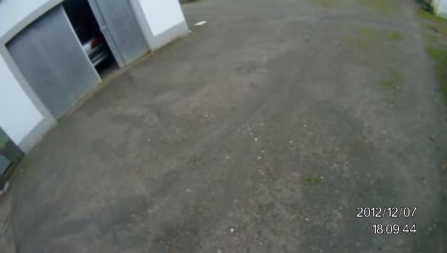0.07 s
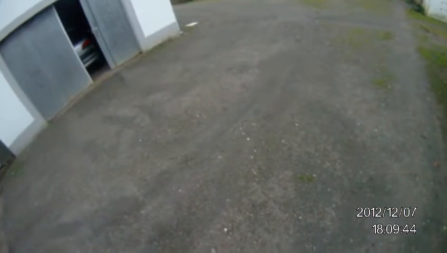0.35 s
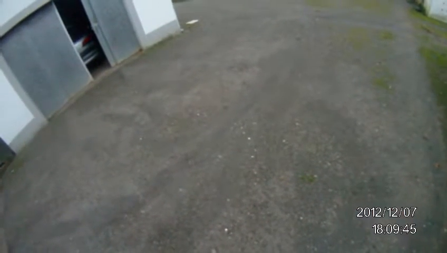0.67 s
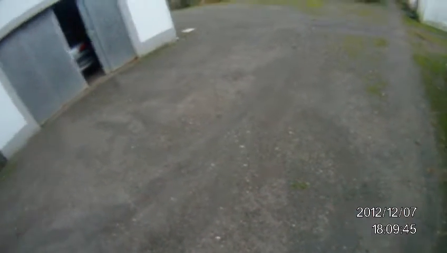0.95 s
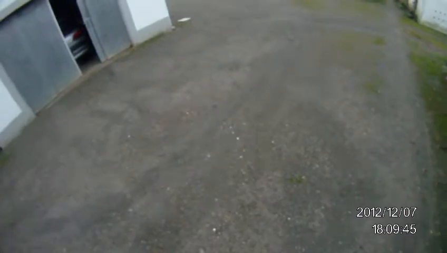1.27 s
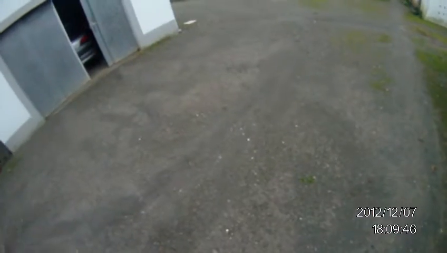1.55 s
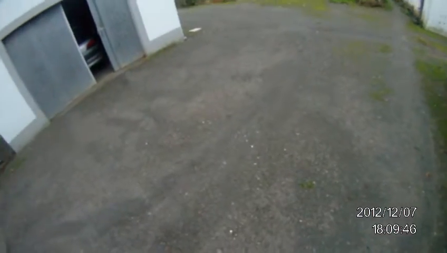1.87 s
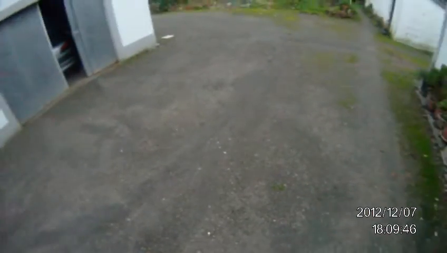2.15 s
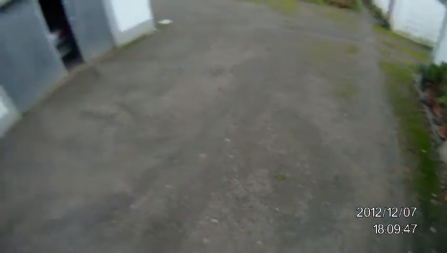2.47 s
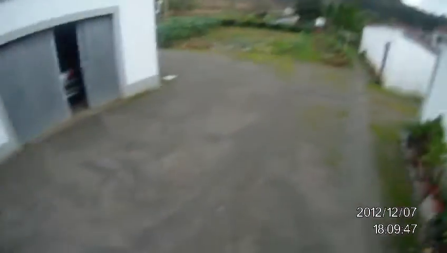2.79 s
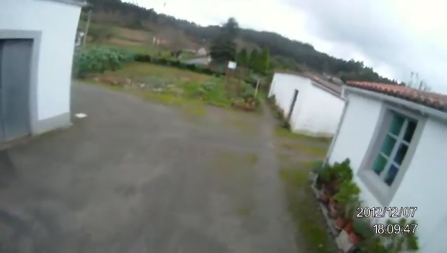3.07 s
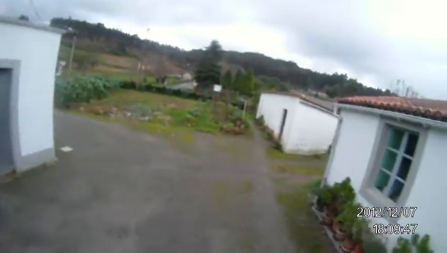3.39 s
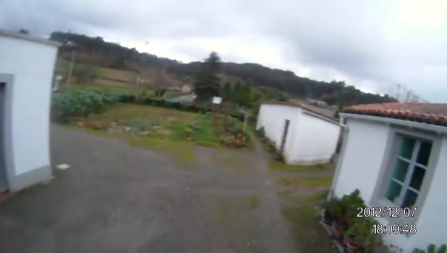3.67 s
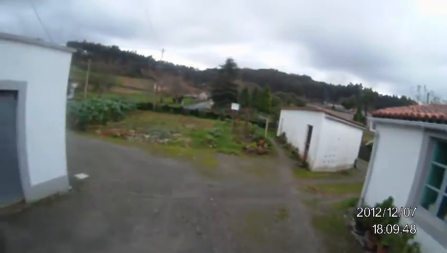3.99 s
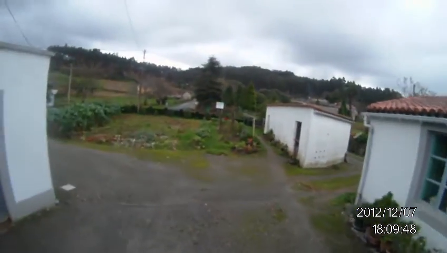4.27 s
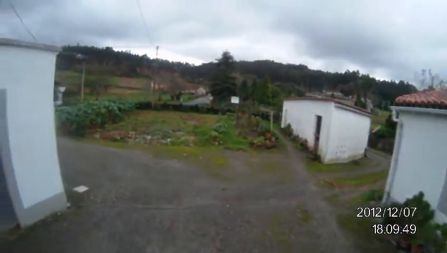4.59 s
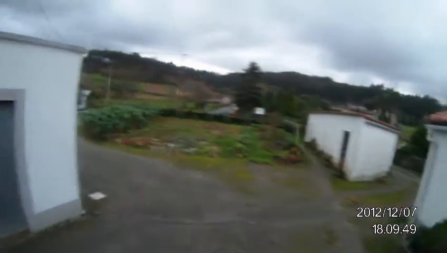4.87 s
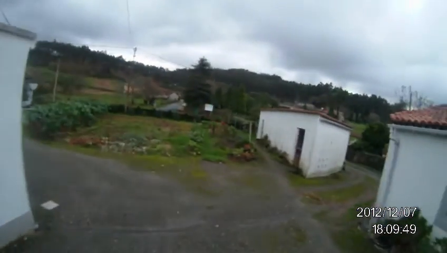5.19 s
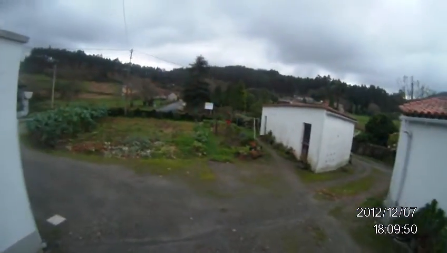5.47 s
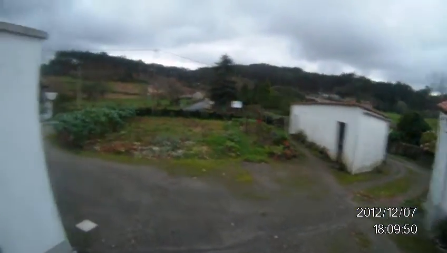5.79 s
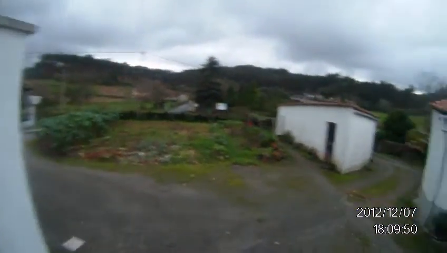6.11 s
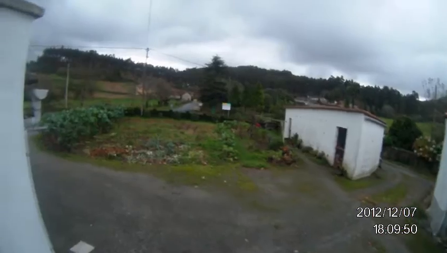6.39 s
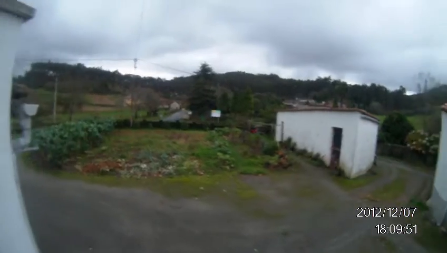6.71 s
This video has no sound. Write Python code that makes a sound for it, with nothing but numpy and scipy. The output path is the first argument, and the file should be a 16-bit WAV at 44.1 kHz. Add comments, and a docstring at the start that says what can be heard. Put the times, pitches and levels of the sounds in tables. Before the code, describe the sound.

A telescopic carbon pole is pulled out in a quiet yard, heard through a microphone fixed to it, so everything sounds close, boxy and nasal. Scraping starts at once, with two hard knocks at about 0.25 seconds, then a brief high creak and a faint low hum. Light rubs and scattered knocks follow until 1.5 seconds, then a short lull. From 2.3 to 2.7 seconds comes a dense clatter with a strong scrape and another brief hum. The tubes now sound hollower, rasping in short pulls with ticking snags. Hard knocks land at 3.5 seconds and cluster from 3.9 to 4.2. Softer rubbing leads to more knocks between 5.2 and 5.8 seconds. The loudest knock overloads the microphone at 6.4 seconds, and one more follows near 6.7. Faint air and hiss stay far behind throughout.

```python
"""Close, rasping scrapes and hard knocks: a telescopic carbon pole is pulled out and raised in a quiet yard.
The microphone is in a small camera fixed to the pole, so every contact rings the thin tubes and arrives
through the camera's case, which honks near 1.5 kHz. The sections rub, snag and knock in their joints;
one tight joint creaks and two shoves make the pole hum. Nested, it sounds stiff and full; drawn out,
hollow. The hardest knocks overload the microphone, and faint air and hiss lie behind it all."""
import sys
import numpy as np
from scipy import signal
from scipy.io import wavfile
from scipy.ndimage import uniform_filter1d

SR = 44100
rng = np.random.default_rng(int(sys.argv[2]) if len(sys.argv) > 2 else 0)


def log_audio(samples):
    """Write samples as a 16-bit WAV file to the path given in sys.argv[1]."""
    # one column per channel
    frames = np.atleast_2d(samples).T
    # limit to full scale, then quantise
    limited = np.clip(frames, -1, 1)
    pcm = np.round(limited * 32767).astype(np.int16)
    wavfile.write(sys.argv[1], SR, pcm)


N = 297234
TIME = np.arange(N) / SR

# knocks in the joints, bass and treble against the middle band:
# start_s, peak_db, bass_db, treble_db, chatter_s
JOINT_KNOCKS = [(0.237, -4.5, -7.5, -3.5, 0.0041), (0.259, 2.5, -14.5, -10, 0.0031),
                (0.639, -19, -13.5, -11, 0.0016), (1.026, -6, -19.0, -20.5, 0.00088),
                (1.179, -13, -27, -25, 0.0021), (1.357, -15.5, -16, -15.5, 0.00053),
                (1.416, -42, -15.0, 4.5, 0.001), (1.479, -16, -19, -17.5, 0.0015),
                (1.814, -39.5, -9, -14.0, 0.0026), (2.297, -9.5, -30.0, -7.0, 0.0032),
                (2.426, -3, -18, -10.5, 0.0023), (2.469, -3.5, -16.0, -21, 0.0062),
                (2.486, 4, -20, -14, 0.0032), (2.51, 0.3, -11.0, -13.0, 0.002),
                (2.547, 3.5, -22, -16, 0.002), (2.578, 0, -28.5, -20, 0.0023),
                (2.613, -5.5, -5.0, -8.0, 0.0089), (2.624, -3.5, -8.0, -2.5, 0.0062),
                (2.671, -3.0, -30.5, -7.5, 0.0049), (2.702, -9.5, -32.0, -13.0, 0.0021),
                (2.73, -9.0, -33, -12, 0.0025), (3.459, 1.66, -18.5, -20, 0.00054),
                (3.467, 0.5, -20.0, -23, 0.002), (3.639, -7.0, -29.5, -17.5, 0.0045),
                (3.721, -13, -26, -27, 0.003), (3.943, -1.5, -9.0, -12, 0.002),
                (3.95, 1.5, -18, -12.5, 0.0028), (3.992, 0.85, -27.5, -26.5, 0.00038),
                (4.046, -8.5, -23.5, -25.0, 0.00039), (4.109, 0.5, -28.0, -29, 0.0015),
                (4.204, -2.5, -18.5, -26.0, 0.0016), (4.241, -3.5, -34.5, -13.0, 0.0044),
                (4.531, -25.5, -11.5, -21, 0.0022), (4.895, -19, -25.0, -29, 0.0009),
                (5.192, -6.5, -26.0, -23.5, 0.0031), (5.215, -15.0, -14.5, -19.0, 0.0048),
                (5.295, 0.45, -32.5, -18.5, 0.0028), (5.347, 3.5, -33.5, -23, 0.002),
                (5.383, -4.5, -35, -23.0, 0.004), (5.572, -3, -29.0, -18.5, 0.0031),
                (5.752, -4.0, -36.0, -11.0, 0.0032), (5.807, -18.5, -20.5, -24, 0.0015),
                (5.96, -16.5, -24.5, -30.0, 0.005), (6.184, -6.0, -21.5, -27.0, 0.0051),
                (6.269, -9.5, -22.0, -29, 0.003), (6.408, 9, -31.5, -24.5, 0.003),
                (6.667, 1.5, -27, -24, 0.0031)]
# pulls of one section along the next, firm short ones riding on gentle long ones:
# start_s, length_s, middle_db, treble_db (against the middle band)
PULLS = [(0.0, 0.49, -40.5, -11.5), (0.208, 0.092, -28, -7.5), (0.363, 0.068, -28, -12.5),
         (0.51, 0.088, -45.5, -23), (0.644, 0.036, -31.5, -10.5), (0.785, 0.087, -30, -12),
         (0.893, 0.22, -44, -6.5), (0.962, 0.049, -37.5, -5.5), (1.11, 0.018, -26.5, -8.5),
         (1.145, 0.49, -54, -17), (1.471, 0.057, -39, -20.5), (1.92, 0.066, -55.5, -8.5),
         (2.032, 0.48, -39, -13.5), (2.138, 0.042, -31.5, -24), (2.335, 0.063, -28.5, -14.5),
         (2.445, 0.19, -20, -8), (2.652, 0.33, -30.5, -12.5), (2.85, 0.082, -22, -17),
         (2.993, 0.024, -29.5, -7.5), (3.034, 0.26, -38, -10), (3.114, 0.072, -27.5, -14.5),
         (3.21, 0.033, -25.5, -11), (3.343, 0.035, -25, -11.5), (3.378, 0.6, -37.5, -14.5),
         (3.515, 0.036, -30.5, -7), (3.61, 0.07, -28.5, -13.5), (3.744, 0.09, -27.5, -11.5),
         (3.855, 0.1, -32, -7), (4.082, 0.035, -27.5, -5), (4.344, 0.055, -30, -9.5),
         (4.461, 0.047, -37, -5), (4.608, 0.046, -40.5, -4.5), (4.656, 0.4, -42.5, -19.5),
         (4.739, 0.12, -35, -12), (5.014, 0.035, -33, -9.5), (5.178, 0.23, -40, -15.5),
         (5.447, 0.031, -37, -6.5), (5.58, 0.16, -53.5, -10.5), (5.733, 0.032, -29, -15.5),
         (5.8, 0.56, -38.5, -14.5), (6.43, 0.3, -33, -16.5), (6.542, 0.04, -29.5, -10)]
# the loudest snags, where an edge catches and lets go: start_s, level_db
LOUD_SNAGS = [(1.31, -32.5), (2.906, -18), (3.055, -19.5), (3.13, -17.5), (3.174, -21), (3.804, -21),
              (4.091, -23.5), (4.342, -26), (4.393, -21.5), (6.613, -21.5)]
# fine sheen of the thin tip section sliding out: frequency_hz, relative_db
TIP_SHEEN = [(6300, -30.5), (8400, 0), (10000, -7.5)]
# course of the one creak: time_s, pitch_hz, level_db
CREAK_PATH = [(0.274, 1640, -36.5), (0.294, 1705, -30.5), (0.3, 1870, -19), (0.334, 1684, -38)]
# shoves that bend the pole: start_s, pitch_hz, level_db
SHOVES = [(0.318, 100, -41), (2.42, 113, -38)]
# modes of the tubes: pitch_hz, width_hz, gain_db (over the direct path, before contact and damping)
TUBE_MODES = [(277.6, 21, 7), (391.6, 30, 15), (784, 37, 6), (939, 44, 9.5), (1346, 65, -0.5),
              (1490.3, 65.4, 4), (2338, 51, 16), (3049, 60, 6.5), (3410, 64, 2.5)]
# path through the camera's case to the microphone, pole drawn out: frequency_hz, relative_db
CASE_PATH = [(40, -44), (120, -30), (400, -31.5), (620, -35.5), (1050, -20), (1300, -3.5), (1520, 4.5),
             (1800, -8), (2130, -24.5), (3350, -26.5), (3800, -34.5), (4900, -40.5), (5700, -63),
             (15000, -79)]
# what the stiffer, fuller nested pole adds to that path: frequency_hz, boost_db
NESTED_BOOST = [(80, 1.5), (250, 4.5), (620, 2), (1500, 2), (2050, 10), (2900, 7), (4400, 13), (6500, 11)]
# yard air and microphone hiss: frequency_hz, relative_db
AIR_SPECTRUM = [(30, -15.5), (270, -15), (650, -24), (1500, -2.5), (2200, -16.5), (4300, -16), (5400, -28),
                (15000, -31)]

TIP_OUT_S, DRAWN_OUT_S = 1.15, 2.7  # the tip is out first, then the whole pole
BASS_HZ, TREBLE_HZ = 700, 2100  # edges of the middle band
BAND_FILTERS = [signal.butter(4, hz, kind, fs=SR, output="sos")
                for hz, kind in ((BASS_HZ, "low"), ([BASS_HZ, TREBLE_HZ], "band"), (TREBLE_HZ, "high"))]


def knocks(nested_path, drawn_path, rattle_s=0.017, shudder_s=0.028, spot_db=4.5, size=8192):
    """A blow, a few ms of chatter and a faint rattle ring the tubes; the pole shudders a little longer."""
    out, t = np.zeros(N), np.arange(size) / SR
    for start_s, peak_db, bass_db, treble_db, chatter_s in JOINT_KNOCKS + rebounds():
        nested = start_s < DRAWN_OUT_S
        path = np.pad(nested_path if nested else drawn_path, (50, 0))
        chatter, rattle, sway = rng.standard_normal((3, size))
        spot, shift = rng.standard_normal((2, len(TUBE_MODES)))
        # nested sections damp the ringing, and so does a hard knock that jams them together
        damping_db = 6 * nested + 0.16 * max(peak_db + 12, 0)
        weights, detune = gain_of(spot_db * spot - damping_db), 1 + 0.013 * shift
        force = gain_of(-16) * chatter * swell(2 * t / chatter_s)
        force += gain_of(-36) * rattle * np.exp(-t / rattle_s)
        force[0] += 1  # the blow itself
        blow, shudder = (signal.fftconvolve(tube_ring(push, weights, detune), path)[:size]
                         for push in (force, sway * np.exp(-t / shudder_s)))
        bass, middle, treble = bands(blow)
        bass += gain_of(-8) * bands(shudder)[0]
        knock = gain_of(bass_db) * bass + middle + gain_of(treble_db) * treble
        add(out, start_s, gain_of(peak_db) * knock / abs(knock).max())
    return out


def rebounds(hard_db=3, gap_s=0.0058, step_db=0.8):
    """A hard knock throws the section across its joint, so that it strikes twice more."""
    return [(start_s + k * gap_s, peak_db + k * step_db, *rest)
            for start_s, peak_db, *rest in JOINT_KNOCKS if peak_db > hard_db for k in (1, 2)]


def scrape(nested_path, drawn_path, nested_damping_db=5, sheen_db=-29.5):
    """Sliding sections ring the tubes, each mode coming and going as the contact travels."""
    force = friction()
    nested = TIME < DRAWN_OUT_S
    weights = [gain_of(3 * wander(per_s=24) - nested_damping_db * nested) for _ in TUBE_MODES]
    ring = tube_ring(force, weights, detune=np.ones(len(TUBE_MODES)))
    at_mic = signal.oaconvolve(ring * nested, nested_path) + signal.oaconvolve(ring * ~nested, drawn_path)
    # the hand's pressure holds the friction even over a few hundredths of a second
    bass, middle, treble = (band / np.sqrt(uniform_filter1d(band ** 2, size=2600) + 1e-6)
                            for band in bands(at_mic[:N]))
    bass_gain, middle_gain, treble_gain = pull_gains()
    # within a pull the rasp comes and goes, and the sections catch and give
    rasp = gain_of(1.5 * wander(per_s=24))
    catch = gain_of(1.5 * wander(per_s=45))
    small_snags, loud_snags = snags()
    sheen = gain_of(sheen_db) * (TIME < TIP_OUT_S) * coloured(force, TIP_SHEEN)
    rub = bass_gain * bass + middle_gain * middle + rasp * treble_gain * (treble + sheen)
    return catch * (1 + small_snags) * rub + loud_snags * (middle + gain_of(-15) * treble)


def friction(slips_per_s=300, uneven_db=2.6, rub_db=-18.5, judder_db=3, echo_s=0.000812):
    """Tiny slips of uneven size over a fine rub make a juddering force."""
    slipping = rng.random(N) < slips_per_s / SR
    sizes = gain_of(uneven_db * np.minimum(rng.exponential(1, N), 4))
    slips = slipping * sizes * rng.choice([-1, 1], N)
    force = slips + gain_of(rub_db) * rng.standard_normal(N)
    force *= gain_of(judder_db * wander(per_s=70))
    # the tube's end throws each slip back after a delay that moves with the contact
    delay_s = echo_s * np.exp(.5 * wander(per_s=10))
    return force + .5 * np.interp(TIME - delay_s, TIME, force)


def pull_gains(bite_share=0.062, swell_db=0.5, release_db_per_s=751, usual_db=-33.5):
    """Bass, middle and treble gain of the rub: pulls bite, hold nearly steady and die away."""
    middle_power, treble_power = np.full((2, N), 1e-12)
    for start_s, length_s, middle_db, treble_db in PULLS:
        t = np.maximum(TIME - start_s, 0)
        bite = np.minimum(t / (bite_share * length_s), 1)
        shape_db = swell_db * (np.minimum(t / length_s, 1) - .5)
        shape_db -= release_db_per_s * np.maximum(t - length_s, 0)
        power = (bite * gain_of(middle_db + np.maximum(shape_db, -200))) ** 2
        middle_power += power
        treble_power += power * gain_of(treble_db) ** 2
    # the bass grows more slowly than the rasp, and is fuller while the pole is nested
    above_usual_db = 10 * np.log10(middle_power) - usual_db
    bass_db = -56.5 + 0.76 * above_usual_db + 3.5 * (TIME < DRAWN_OUT_S)
    return gain_of(bass_db), np.sqrt(middle_power), np.sqrt(treble_power)


def snags(per_s=22, rise_s=0.003):
    """Edges catch and let go with a tick: envelopes of the small random snags and of the loud ones."""
    tick = swell(TIME[:2048] / rise_s) ** 2
    catches = rng.random(N) < per_s / SR
    small = signal.oaconvolve(.5 * catches, tick)[:N]
    loud = np.zeros(N)
    for start_s, level_db in LOUD_SNAGS:
        add(loud, start_s, gain_of(level_db) * tick)
    return small, loud


def tube_ring(force, weights, detune):
    """The direct push plus the tubes' modes; the place of contact weights and shifts each mode."""
    out = force.copy()
    for (pitch_hz, width_hz, gain_db), weight, shift in zip(TUBE_MODES, weights, detune):
        radius = np.exp(-np.pi * width_hz / SR)
        mode = radius * np.exp(2j * np.pi * pitch_hz * shift / SR)
        out += 2 * gain_of(gain_db) * signal.lfilter([1 - radius], [1, -mode], force * weight + 1e-18).real
    return out


def hollow(path, round_trip_s=0.0089, bounce_db=-11):
    """Sound runs up and down the long, drawn-out tube, weaker at each return."""
    t = TIME[:len(path)]
    return sum(gain_of(k * bounce_db) * np.interp(t - k * round_trip_s, t, path, left=0) for k in range(4))


def creak(path, width_hz=170, thud_db=-9):
    """A tight joint sticks and slips as it turns, ringing one gliding resonance and shaking the pole."""
    times_s, pitches_hz, levels_db = np.transpose(CREAK_PATH)
    t = np.arange(times_s[0], times_s[-1], 1 / SR)
    slips = rng.standard_normal(len(t))
    radius = np.exp(-np.pi * width_hz / SR)
    flutter = signal.lfilter([1], np.poly([radius, radius]), slips + 1j * rng.standard_normal(len(t)))
    phase = 2 * np.pi * np.cumsum(np.interp(t, times_s, pitches_hz)) / SR
    tone = unit_rms((flutter * np.exp(1j * phase)).real)
    thud = bands(signal.fftconvolve(slips, path)[:len(t)])[0]
    envelope = gain_of(np.interp(t, times_s, levels_db)) * signal.windows.tukey(len(t), .1)
    out = np.zeros(N)
    add(out, times_s[0], envelope * (tone + gain_of(thud_db) * thud))
    return out


def flex(rise_s=0.02):
    """The pole bends under a shove and hums low as it springs back."""
    out, t = np.zeros(N), TIME[:SR // 2]
    for start_s, pitch_hz, level_db in SHOVES:
        add(out, start_s, gain_of(level_db) * swell(t / rise_s) * np.sin(2 * np.pi * pitch_hz * t))
    return out


def yard_air(level_db=-61.5):
    """The still yard and the microphone's own hiss, far below the pole."""
    return gain_of(level_db) * coloured(rng.standard_normal(N), AIR_SPECTRUM)


def response(spectrum, boost=((1, 0),), spread_s=0, size=4096):
    """An impulse response; with spread_s, bending waves bring the treble first and the bass later."""
    hz = np.fft.fftfreq(size, 1 / SR)
    log_gain = np.log(gain_of(db_at(spectrum, abs(hz)) + db_at(boost, abs(hz))))
    lag = 4 * np.pi * spread_s * np.sign(hz) * np.sqrt(1500 * abs(hz))
    minimum_phase = np.conj(signal.hilbert(log_gain))
    return np.fft.ifft(np.exp(minimum_phase - 1j * lag)).real[:size // 2]


def coloured(x, spectrum):
    """A sound filtered by a spectrum, at unit level."""
    return unit_rms(signal.oaconvolve(x, response(spectrum))[:N])


def bands(x):
    """Bass, middle and treble of a sound, each at unit level."""
    return [unit_rms(signal.sosfiltfilt(sos, x, padtype=None)) for sos in BAND_FILTERS]


def wander(per_s):
    """A smooth random curve of unit size."""
    knots = rng.standard_normal(4096)
    return unit_rms(np.interp(TIME * per_s, np.arange(len(knots)), knots))


def swell(u):
    """Rises to 1 at u = 1, then dies away."""
    return u * np.exp(1 - u)


def db_at(spectrum, hz):
    points_hz, points_db = np.transpose(spectrum)
    return np.interp(np.log(hz + 1), np.log(points_hz + 1), points_db)


def gain_of(db):
    return 10 ** (np.asarray(db) / 20)


def unit_rms(x):
    return x / np.sqrt(np.mean(x ** 2) + 1e-20)


def add(mix, start_s, sound):
    part = mix[max(round(start_s * SR), 0):][:len(sound)]
    part += sound[:len(part)]


def scene():
    """The pole heard in mono from the camera fixed to it, with the yard behind."""
    nested_path = response(CASE_PATH, NESTED_BOOST, spread_s=0.00044)
    drawn_path = response(CASE_PATH, spread_s=0.00087)
    pole = knocks(nested_path, drawn_path) + scrape(nested_path, hollow(drawn_path))
    return (pole + creak(nested_path) + flex() + yard_air())[None]


def record(dry, rumble_hz=50, top_hz=15700):
    """The microphone input clips hard at full scale, then sheds its lowest rumble and highest treble."""
    low_cut = signal.butter(2, rumble_hz, "high", fs=SR, output="sos")
    high_cut = signal.firwin(255, top_hz, window=("kaiser", 8), fs=SR)
    clipped = np.clip(dry, -1, 1)
    return signal.oaconvolve(signal.sosfilt(low_cut, clipped), high_cut[None], "same")


dry = scene()
out = record(dry)
log_audio(out)
```